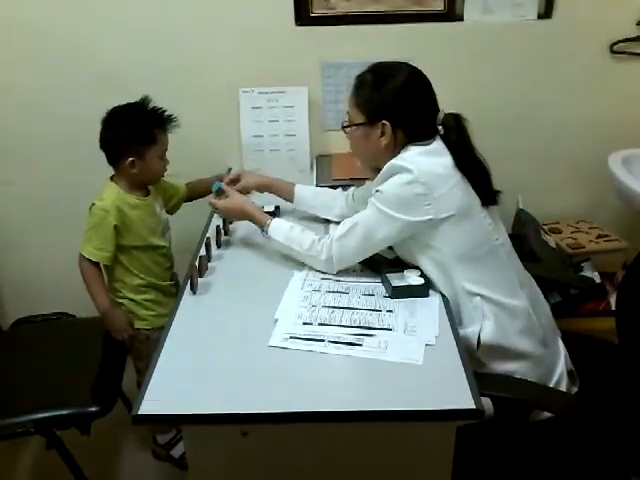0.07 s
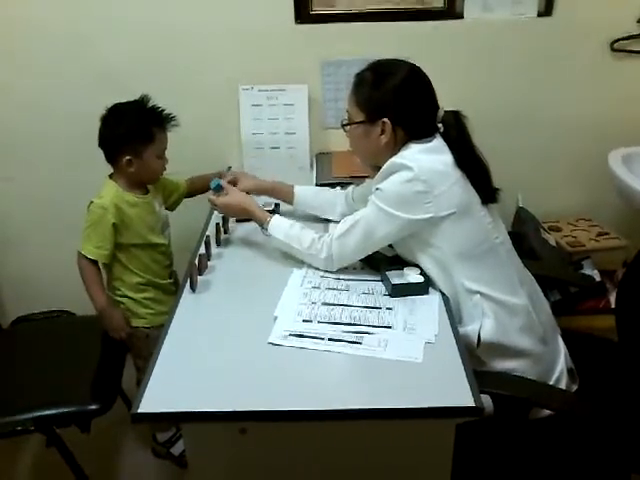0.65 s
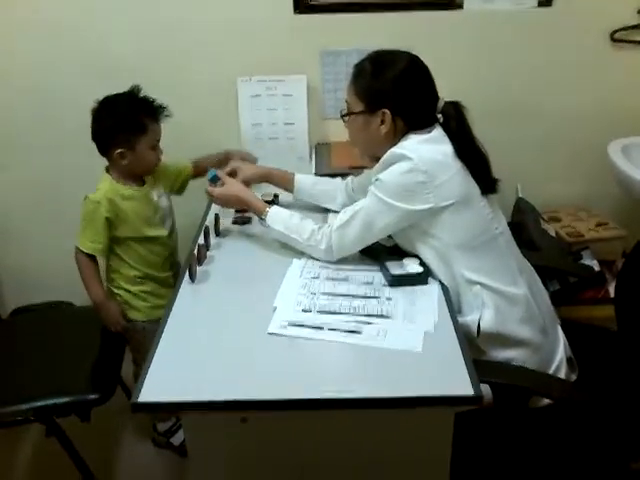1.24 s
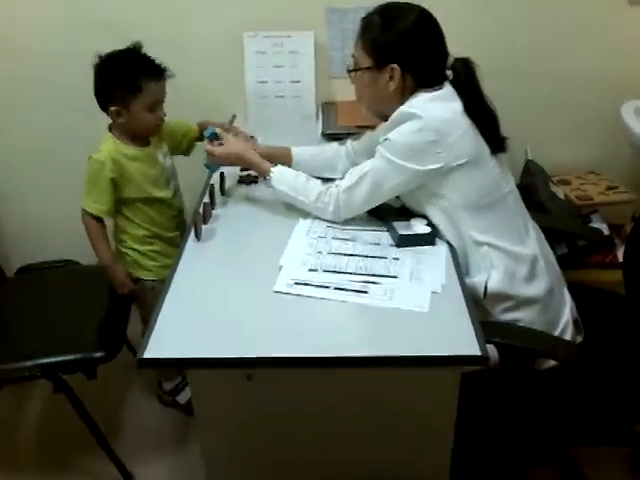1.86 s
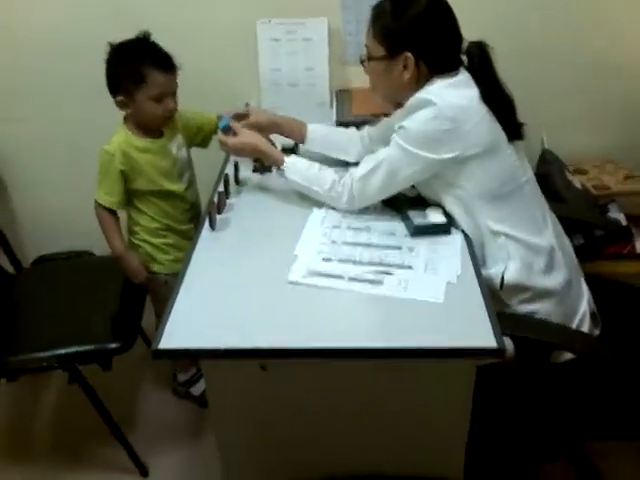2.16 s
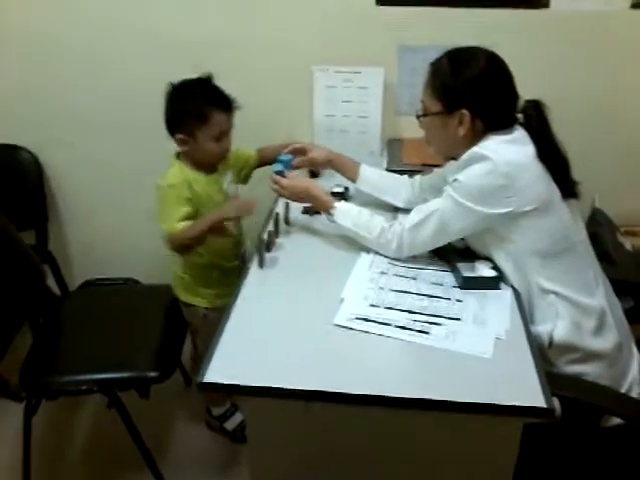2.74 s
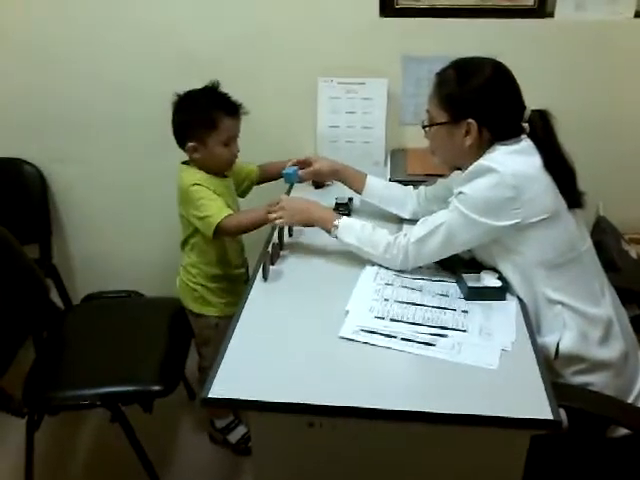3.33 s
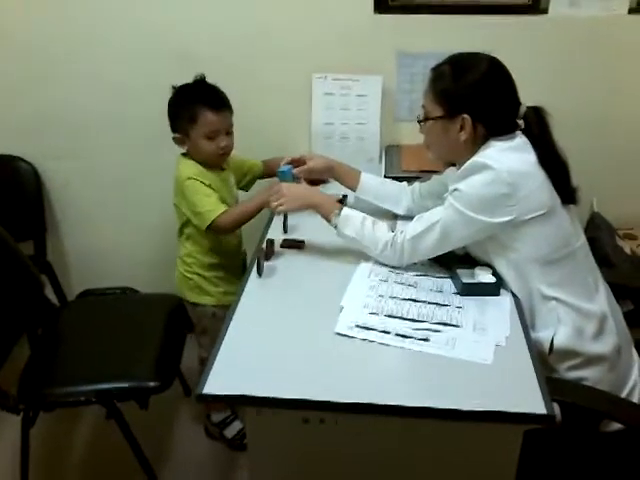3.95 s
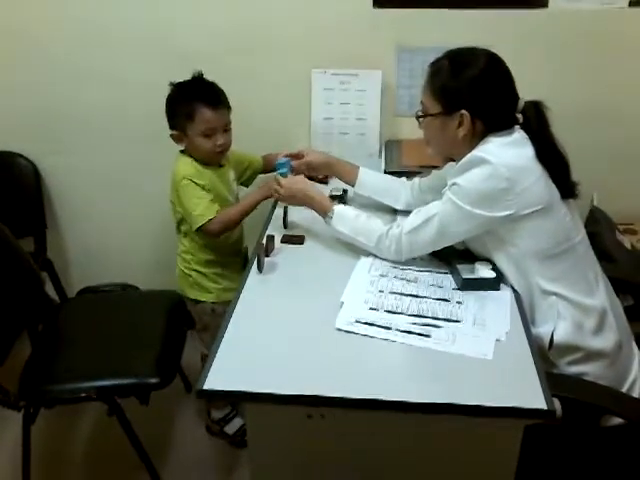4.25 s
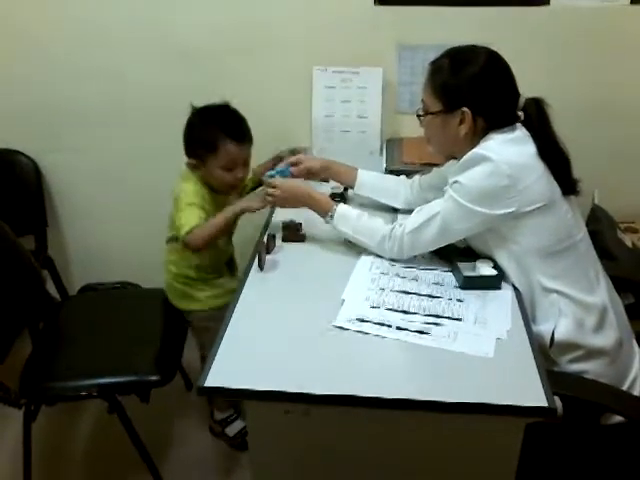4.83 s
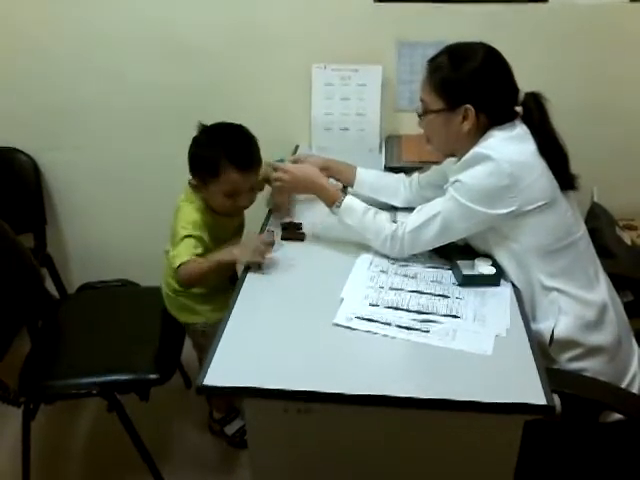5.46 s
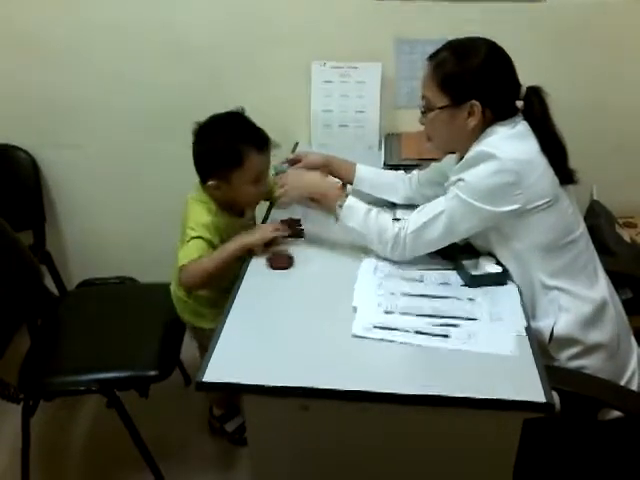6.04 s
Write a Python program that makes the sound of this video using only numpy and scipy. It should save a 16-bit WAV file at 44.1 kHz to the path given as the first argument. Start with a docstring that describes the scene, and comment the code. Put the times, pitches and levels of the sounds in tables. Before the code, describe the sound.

Scattered sharp clicks of small hard pieces set on a tabletop in a small room, building to a brief clatter and wobble.

```python
"""Small hard discs click down on a laminated desk in a bare little room.
Each hit rings the desk top and the disc, with a few soft bumps in between. Two discs topple and rattle
to rest, their rims slapping ever faster; another rocks round on its rim with a gritty, pulsing roll.
Underneath, sleeves rustle faintly over a bed of ventilation hum, and a thin whistle arches by once."""
import sys
import numpy as np
from scipy import signal
from scipy.fft import rfft, irfft, next_fast_len
from scipy.io import wavfile

SR = 44100
rng = np.random.default_rng(int(sys.argv[2]) if len(sys.argv) > 2 else 0)


def master_out(mix):
    """Clip the mix to full scale and print it as 16-bit PCM to the path in sys.argv[1]."""
    frames = np.transpose(np.atleast_2d(mix))
    ceiling = np.clip(frames, -1, 1)
    pcm = np.round(ceiling * 32767).astype(np.int16)
    wavfile.write(sys.argv[1], SR, pcm)


N = 273085
TIME = np.arange(N) / SR
HZ = np.fft.rfftfreq(8192, 1 / SR)

# ventilation rumble and hiss (frequency [Hz], relative level [dB])
AIR_COLOUR = [(25, -13.5), (42, -9), (75, 2), (105, -2.5), (160, 0.5), (250, -3), (400, -11), (800, -16),
              (2000, -24), (4500, -32), (7300, -29), (10000, -32.5), (16000, -32)]
# ventilation hum tones (frequency [Hz], relative level [dB])
HUM_TONES = [(118.4, -68), (150.7, -66), (306.8, -72), (376.8, -72), (570.6, -78), (619.1, -78)]
# a sleeve brushes past (peak time [s], half length [s], level [dB])
BRUSHES = [(0.144, 0.22, -78.5), (1.688, 0.054, -51), (2.42, 0.15, -73.5), (4.15, 0.14, -69),
           (5.326, 0.047, -70), (6.056, 0.063, -55)]
# sliding cloth (frequency [Hz], relative level [dB])
CLOTH_COLOUR = [(200, -17), (1000, -6), (3000, -4.5), (5500, -1.0), (7400, 0.5), (9500, -10),
                (12000, -18), (16000, -28)]
# a disc hits the desk (time [s], strength [dB], treble tilt [dB/octave], knock pitch [Hz],
# knock boost [dB], disc ring pitch [Hz], ring boost [dB])
CLICKS = [ (0.3429, -34, -9, 1870, -7, 7100, 1), (0.4563, -4, 7, 1920, 10.5, 7040, 18.5),
          (0.4623, -4, 2, 1100, 12, 7340, 1), (0.6084, -5.5, 0, 2330, 8, 7400, 9),
          (1.1748, 2.5, 3, 1730, 11.5, 7000, 3.5), (1.4613, -15, -5, 1920, 12, 7400, 5),
          (1.4761, 0, 3, 2200, 8, 7420, 16.5), (2.2392, -33.5, -1, 3500, -1, 7200, -2),
          (2.836, -11.5, -1.5, 1830, 6.5, 7250, 10.5), (3.4669, -24.5, -19.5, 2000, 2.5, 7400, 15),
          (3.7102, 3.5, 0.5, 2350, 9, 7470, 8.5), (3.949, -39, -16.5, 1810, 4, 7160, -5.5),
          (4.1033, -5.5, -2, 1900, 0.5, 6400, 0), (4.2460, -4, 4, 1880, 3.5, 7020, 12.5),
          (4.7164, 5, -4, 2400, 6.5, 5770, 1), (4.7335, -3, 0, 1850, 0, 8380, 18.5),
          (4.7422, -1, -4, 1850, 1.5, 5740, 16), (4.8863, -7.5, -7, 2300, -3, 8400, 15),
          (4.9468, 0.6, -5, 1950, 3, 8170, 13), (5.0138, -9.5, -11, 2360, 0, 8200, 26),
          (5.0623, -10, -3.5, 2260, -1, 8200, 22), (5.1576, -13.5, -3.5, 2200, 4, 8320, 18.5),
          (5.5948, -11, -9, 1990, 11, 6500, -4), (5.7240, -15.5, -7, 2080, 5, 6550, 12.5),
          (6.1150, -18, -8, 1690, 10.5, 6500, 8), (6.1742, 6, 0.5, 2560, -1, 6950, 5.5)]
# a hard contact on the desk (frequency [Hz], gain [dB])
CONTACT_COLOUR = [(40, -30.5), (110, -12.5), (330, -9), (600, -9.5), (1000, -2.5), (1600, 0.5), (3500, 0.5),
                  (7200, -5), (9500, -11.5), (11000, -20.5), (13000, -28), (16000, -40.5)]
# resonances of the desk top (frequency [Hz], width [Hz], boost [dB])
DESK_MODES = [(121.2, 2.7, 16.5), (337, 13, 5), (576, 30, 3), (1067, 43, 2), (1400, 70, -1), (2550, 100, 2)]
# tone of the direct path against the room (frequency [Hz], gain [dB])
DIRECT_COLOUR = [(100, 0), (1000, -13.5), (1700, -2.5), (3500, -3.5), (5000, -1.5), (7500, -3.5),
                 (12000, -7.5)]
# short resonances on the direct path (frequency [Hz], width [Hz], boost [dB])
CRACK_MODES = [(2700, 550, -2), (3200, 1400, 7)]
# reverb of the room (frequency [Hz], time to fall 60 dB [s])
ROOM_DECAY = [(120, 1), (400, 0.59), (1000, 0.36), (2800, 0.33), (7300, 0.36), (14000, 0.29)]
# soft bumps and shoves on the desk (start [s], level [dB], pitch [Hz])
BUMPS = [(0.626, -50, 324), (1.756, -60, 785), (2.252, -53, 78), (2.299, -58.5, 205), (2.837, -50.5, 280),
         (3.42, -60.5, 1500), (3.98, -65, 1370), (4.953, -42, 342), (5.289, -48.5, 205), (5.54, -48, 550)]
# partials of the whistle (pitch [ratio], relative level [dB])
WHISTLE_PARTIALS = [(.92, 1), (1.02, 2.5), (1.16, 1), (1.4, -8)]
# a disc topples (start [s], time to rest [s], strength [dB], treble [dB], starting slap rate [1/s])
TOPPLES = [(4.72, 0.28, -6.5, -2.5, 88), (4.95, 0.228, -9.0, 4.6, 85)]
# tone of a rattling disc (frequency [Hz], gain [dB])
RATTLE_COLOUR = [(40, -33), (120, -11), (500, -8.5), (1000, 2), (1800, 7.5), (2700, 3.5), (4000, -4.5),
                 (5000, -13), (7300, -12), (9500, -20.5), (11000, -24.5), (12300, -20), (13500, -47),
                 (16000, -38)]
# resonances of a rattling disc (frequency [Hz], width [Hz], boost [dB])
RATTLE_MODES = [(8150, 88, 13.5), (11660, 400, 7)]
# the rocking disc bears down once a turn (peak time [s], strength [dB], treble [dB], half length [s])
ROCK_TURNS = [(5.595, -4, 15.5, 0.0046), (5.725, -9.5, 11.5, 0.0096), (5.865, -16, 10.5, 0.0063),
              (5.999, -8.5, 4.5, 0.0063), (6.113, -9.5, 12, 0.0072)]
# tone of the rocking disc (frequency [Hz], gain [dB])
ROCK_COLOUR = [(40, -9), (120, -5), (500, 4), (1100, 8.5), (2000, 7), (3000, -6.5), (4700, -22.5),
               (7000, -26.5), (8200, -25), (10000, -25), (11200, -43), (16000, -43)]
# resonances of the rocking disc (frequency [Hz], width [Hz], boost [dB])
ROCK_MODES = [(6500, 230, 12.5), (10400, 360, 1)]


def amp(db):
    """Decibels to gain."""
    return 10 ** (np.asarray(db) / 20)


def unit(x):
    """Scales to rms 1."""
    return x / np.sqrt(np.mean(x ** 2) + 1e-20)


def curve_at(points, hz):
    """Reads a curve on a log-frequency axis."""
    f, value = np.transpose(points)
    return np.interp(np.log(hz + 1), np.log(f + 1), value)


def add(mix, s, sound):
    """Mixes a sound in at s seconds."""
    part = mix[max(round(s * SR), 0):][:len(sound)]
    part += sound[:len(part)]


def swell(peak_s, half_s):
    """A bell-shaped envelope of height 1."""
    return np.exp(-((TIME - peak_s) / half_s) ** 2 / 2)


def wander(rate_hz, count=16):
    """Smooth random modulation of rms 1, up to the given rate."""
    t = TIME[::64]
    rates = np.geomspace(rate_hz / 10, rate_hz, count)
    drift = sum(np.sin(2 * np.pi * (f * t + rng.random())) for f in rates)
    return unit(np.interp(TIME, t, drift))


def noise(colour):
    """Noise of rms 1 with the given colour."""
    size = next_fast_len(N)
    gain = amp(curve_at(colour, np.fft.rfftfreq(size, 1 / SR)))
    return unit(irfft(rfft(rng.standard_normal(size)) * gain, size)[:N])


def ventilation(rumble_db=-58, swell_db=0.7, swell_hz=0.73, hum_trim_db=-1.0):
    """The bed: moving air rumbles and faintly hisses under a steady hum."""
    hum = sum(amp(db + hum_trim_db) * np.sqrt(2) * np.sin(2 * np.pi * (hz * TIME + rng.random()))
              for hz, db in HUM_TONES)
    return amp(rumble_db + swell_db * wander(swell_hz)) * noise(AIR_COLOUR) + hum


def sleeves(stir_db=-73.5, catch_db=1.2, catch_hz=25):
    """Cloth never lies quite still: its soft hiss flutters as it catches and swells at each brush."""
    sliding = amp(stir_db) + sum(amp(db) * swell(s, half_s) for s, half_s, db in BRUSHES)
    return noise(CLOTH_COLOUR) * sliding * amp(catch_db * wander(catch_hz))


def body(colour_db, modes):
    """Impulse response of a struck body: a broad colour with ringing resonances on top."""
    modes_db = sum(10 * np.log10(1 + (amp(peak) ** 2 - 1) / (1 + (2 * (HZ - hz) / width) ** 2))
                   for hz, width, peak in modes)
    db = colour_db + modes_db
    log_gain = np.log(amp(np.r_[db, db[-2:0:-1]]))
    spectrum = np.exp(np.conj(signal.hilbert(log_gain)))  # minimum phase keeps the attack sharp
    return np.fft.ifft(spectrum).real[:len(HZ)]


def spot_modes(count=7, low_hz=1350, high_hz=6000, width_hz=130, peak_db=4):
    """Every spot on the desk favours some modes and starves others."""
    places = (np.arange(count) + rng.random(count)) / count
    pitches = low_hz * (high_hz / low_hz) ** places
    return [(hz, width_hz, sign * peak_db) for hz, sign in zip(pitches, rng.choice([-1, 1], count))]


def clicks(tilt_hz=2000, knock_width_hz=340, ring_width_hz=330, chatter_s=0.0026, chatter_db=-3,
           snap_db=5.0, snap_width_hz=300, knock_room_share=0.32):
    """A disc lands with a tiny chatter and rings with the desk; the direct path has the most knock."""
    out, t = np.zeros(N), TIME[:SR // 150]
    octaves = np.log2(1 + (HZ / tilt_hz) ** 2) / 2
    for s, db, tilt, knock_hz, knock_db, ring_hz, ring_db in CLICKS:
        colour = db + curve_at(CONTACT_COLOUR, HZ) + tilt * (octaves - 1)
        modes = DESK_MODES + spot_modes() + [(ring_hz, ring_width_hz, ring_db)]
        knock = [(knock_hz, knock_width_hz, knock_db)]
        reverb_send = body(colour, modes + [(knock_hz, knock_width_hz, knock_room_share * knock_db)])
        bounces = rng.standard_normal(len(t)) * np.exp(-t / chatter_s)
        chatter = signal.fftconvolve(body(colour, modes + knock), bounces / np.linalg.norm(bounces))
        # a light tap puts more of its sound into the modes and less into the tick
        light_db = 0.48 * np.clip(-db, 0, 14)
        snap = [(knock_hz, snap_width_hz, snap_db)]
        crack = [(hz, width, peak + light_db) for hz, width, peak in CRACK_MODES + snap]
        direct = body(colour + curve_at(DIRECT_COLOUR, HZ) - light_db, modes + knock + crack)
        add(out, s, room(reverb_send, wet_db=10, direct_db=-21))
        add(out, s, amp(chatter_db - light_db) * chatter)
        add(out, s, direct)
    return out


def room(x, wet_db, direct_db, early_db=3, early_s=0.00071, predelay_s=0.0011):
    """Direct sound, quick echoes off desk and near wall, then a dense tail, fresh for every spot."""
    size = SR * 3 // 5
    t = TIME[:size]
    echoes = rng.choice([-1., 1.], size) * (t > predelay_s) * (1 + amp(early_db) * np.exp(-t / early_s))
    hz, frame_s, bands = signal.stft(echoes, SR, nperseg=256)
    decay = amp(-60 * frame_s / curve_at(ROOM_DECAY, hz)[:, None])
    tail = signal.istft(bands * decay, SR, nperseg=256)[1][:size]
    response = amp(wet_db) * tail / np.linalg.norm(tail)
    response[0] += amp(direct_db)
    return signal.fftconvolve(x, response)


def bumps(rise_s=0.022, q=0.99):
    """Soft pushes on the desk: dull thuds that swell and die away."""
    out, t = np.zeros(N), TIME[:SR // 2]
    envelope = t / rise_s * np.exp(1 - t / rise_s)
    for s, db, hz in BUMPS:
        b, a = signal.iirpeak(hz, q, SR)
        thud = unit(signal.lfilter(b, a, signal.lfilter(b, a, rng.standard_normal(len(t)))))
        add(out, s, amp(db) * thud * envelope)
    return out


def fuzzy_tone(hz, width_hz):
    """A narrow band of noise that follows a pitch."""
    pole = np.exp(-np.pi * width_hz / SR)
    white = rng.standard_normal(N) + 1j * rng.standard_normal(N)
    fuzz = signal.lfilter([1], np.poly([pole, pole]), white)
    carrier = np.exp(2j * np.pi * np.cumsum(hz * np.ones(N)) / SR)
    return unit((fuzz * carrier).real)


def whistle(peak_s=2.4, half_s=0.28, low_hz=7100, rise_hz=1380, level_db=-77.5,
            waver=0.025, waver_hz=16, flicker_db=4, flicker_hz=20):
    """Faint, breathy partials waver and flicker through one high arch, louder as they rise."""
    out, arch = np.zeros(N), swell(peak_s, half_s)
    for ratio, db in WHISTLE_PARTIALS:
        flicker = flicker_db * np.minimum(wander(flicker_hz), 1)
        hz = (low_hz + rise_hz * arch) * ratio * (1 + waver * wander(waver_hz))
        out += amp(level_db + db + flicker) * fuzzy_tone(hz, width_hz=420)
    return np.sqrt(arch) * out


def brighten(x, treble_db, split_hz=4200):
    """A high shelf: harder contacts carry more treble."""
    treble = signal.sosfiltfilt(signal.butter(2, split_hz, "high", fs=SR, output="sos"), x)
    return x + (amp(treble_db) - 1) * treble


def slaps(start_s, length_s, db, treble_db, rate_hz, quicken_octaves=0.36, lighten_db=4, brighten_db=2.5,
          flat_tilt=0.016, spread_db=4.5, jitter=0.22, max_slaps=80, chatter_s=0.00078):
    """A toppling disc's rim slaps the desk faster, lighter and brighter with each halving of its tilt."""
    tilt = np.clip(1 - (TIME - start_s) / length_s, flat_tilt, 1)
    halvings = -np.log2(tilt)
    s, out, t = start_s, np.zeros(N), TIME[:SR // 200]
    for size, gap, *chatter in rng.standard_normal((max_slaps, 2 + len(t))):
        if s < start_s + length_s:
            flatness = halvings[round(s * SR)]
            slap = np.array(chatter) * np.exp(-t / chatter_s)
            gain = amp(db - lighten_db * flatness + spread_db * np.tanh(size))
            add(out, s, gain * slap / np.linalg.norm(slap))
            s += np.exp(jitter * gap) / (rate_hz * 2 ** (quicken_octaves * flatness))
    return brighten(out, treble_db + brighten_db * halvings)


def rattle():
    """The slaps of the two toppling discs ring disc and desk."""
    drive = sum(slaps(*topple) for topple in TOPPLES)
    disc = body(curve_at(RATTLE_COLOUR, HZ), DESK_MODES + RATTLE_MODES)
    return room(signal.oaconvolve(drive, disc)[:N], wet_db=7.5, direct_db=6)[:N]


def rocking(grains_per_s=4000, grain_db=-17, roll_db=-28, sing_hz=6480, sing_db=-60):
    """A disc wobbles on its rim: contact grit swells at each turn, and the rubbed rim sings thinly."""
    turn_s, turn_db, treble_db, half_s = np.transpose(ROCK_TURNS)
    rolling = np.clip((TIME - turn_s[0]) / half_s[0], 0, 1)
    turns = sum(amp(db) * swell(s, half) for s, db, half in zip(turn_s, turn_db, half_s))
    force = turns + amp(roll_db) * rolling
    grains = rng.choice([-1., 1.], N) * (rng.random(N) < grains_per_s / SR)
    drive = brighten(amp(grain_db) * force * grains, np.interp(TIME, turn_s, treble_db))
    rim = amp(sing_db) * rolling * fuzzy_tone(sing_hz, width_hz=260)
    disc = body(curve_at(ROCK_COLOUR, HZ), DESK_MODES + ROCK_MODES)
    return room(signal.oaconvolve(drive, disc)[:N], wet_db=8, direct_db=3.5)[:N] + rim


def scene():
    """The mono mix: discs up front, small noises and room tone behind."""
    return (clicks() + rattle() + rocking() + bumps() + sleeves() + whistle() + ventilation())[None]


def record(dry):
    """A steep high cut at 16 kHz."""
    high_cut = signal.firwin(511, 16000, window=("kaiser", 9), fs=SR)
    return signal.oaconvolve(dry, high_cut[None], "same")


dry = scene()
out = record(dry)
master_out(out)
```